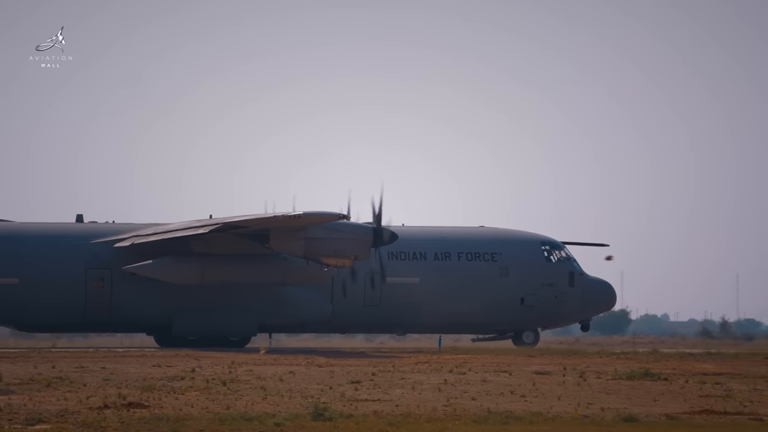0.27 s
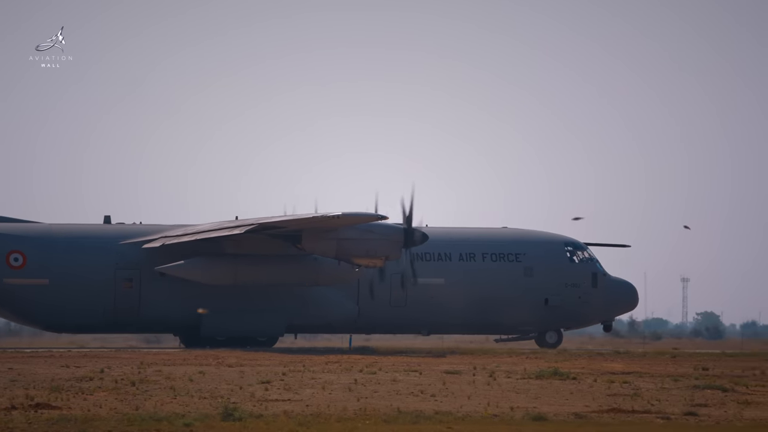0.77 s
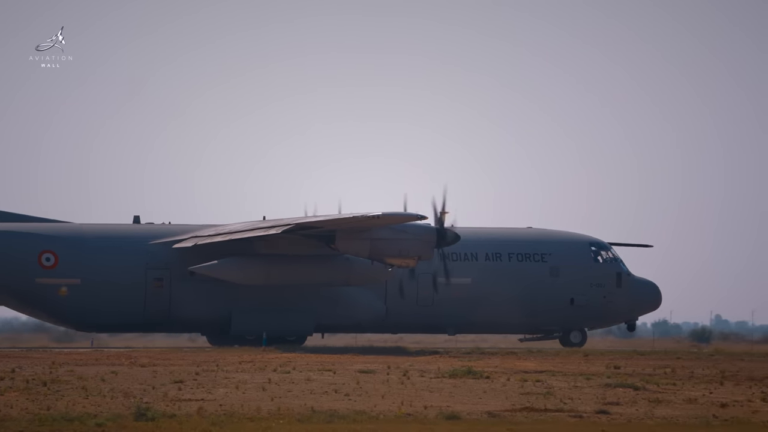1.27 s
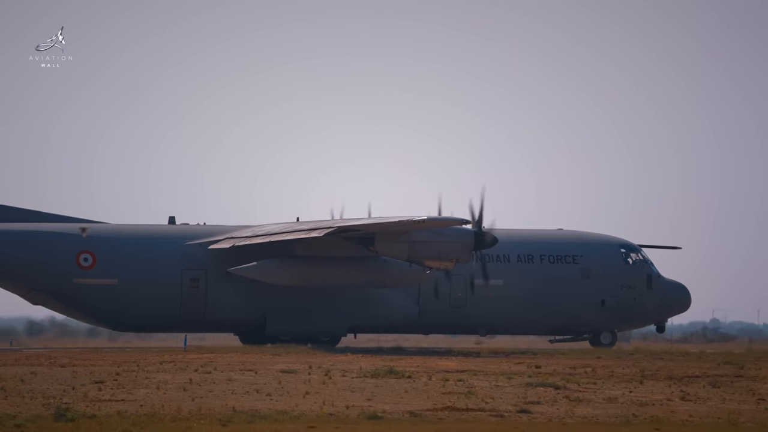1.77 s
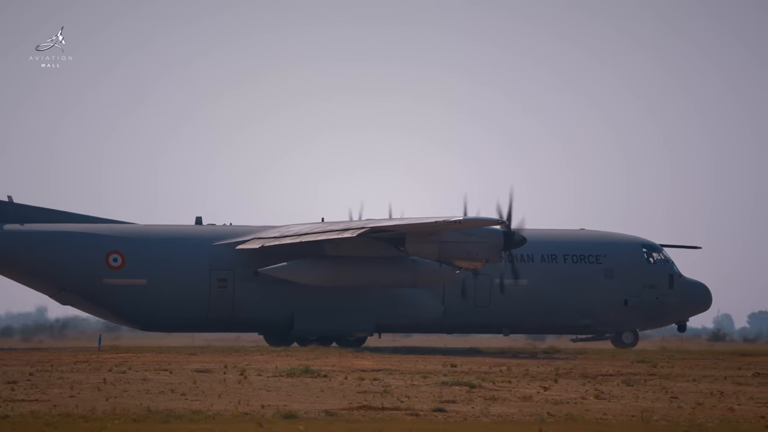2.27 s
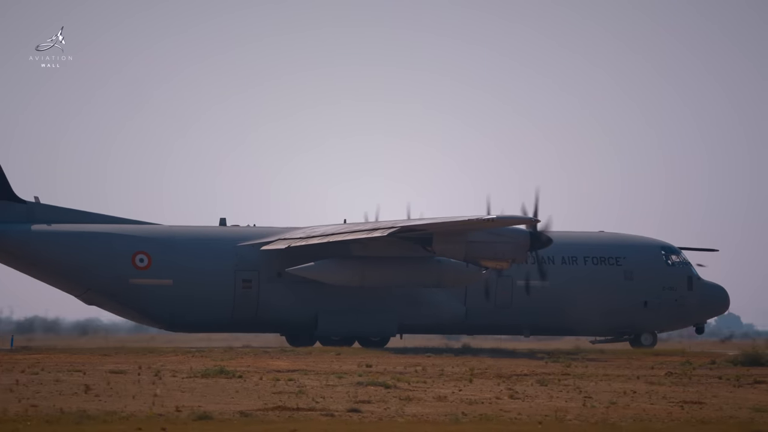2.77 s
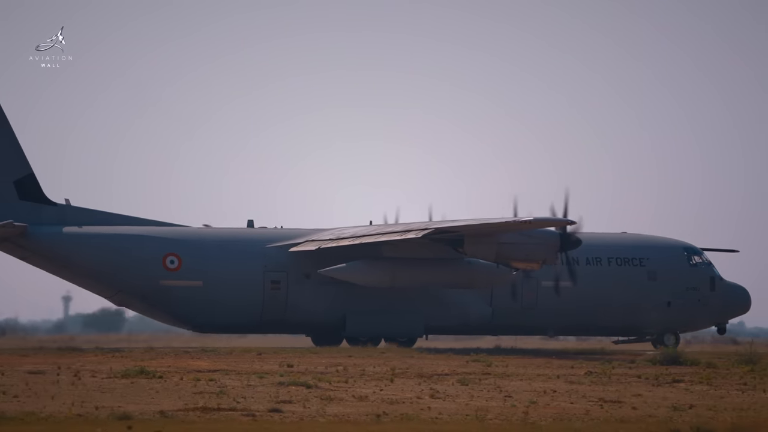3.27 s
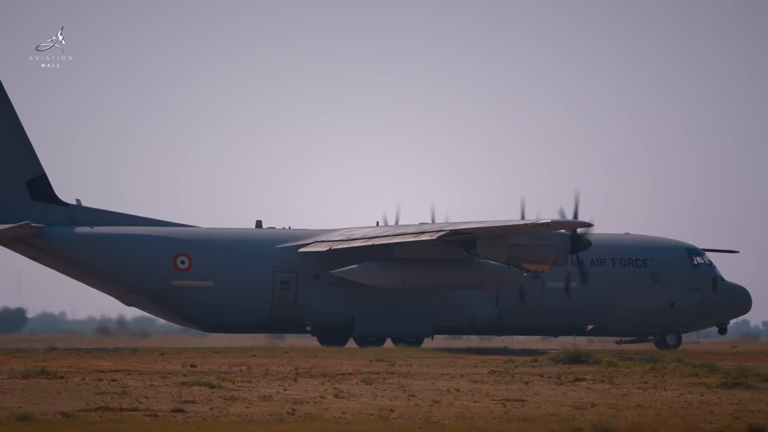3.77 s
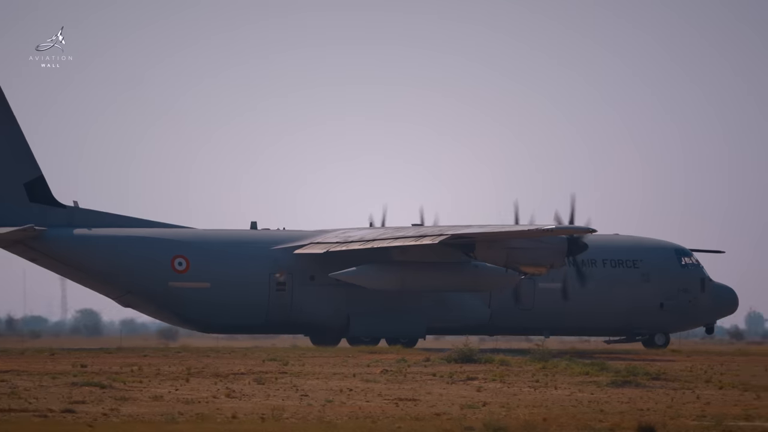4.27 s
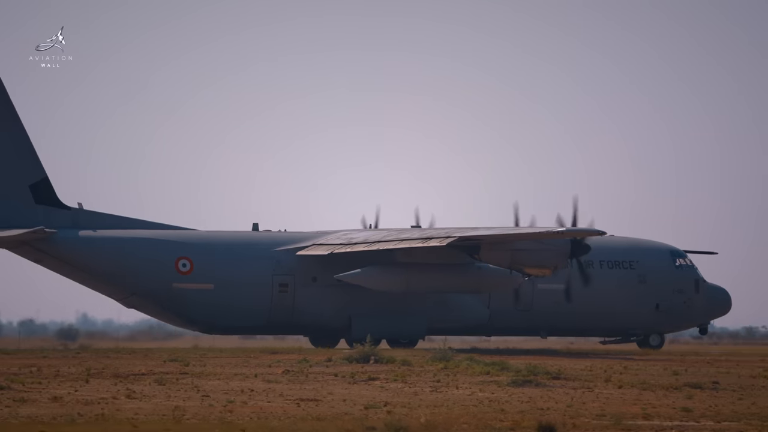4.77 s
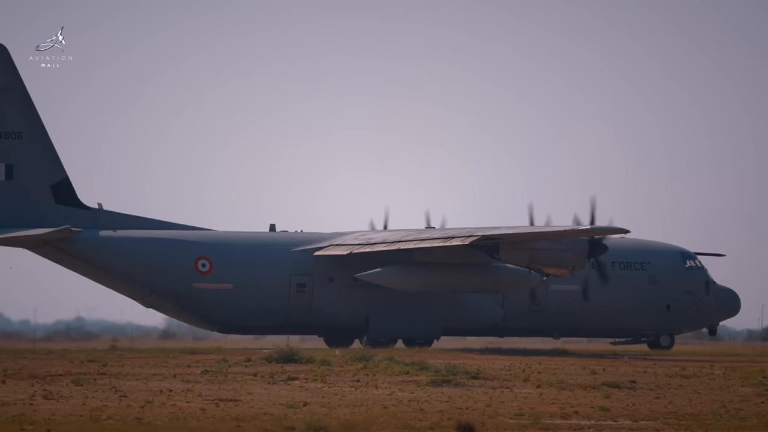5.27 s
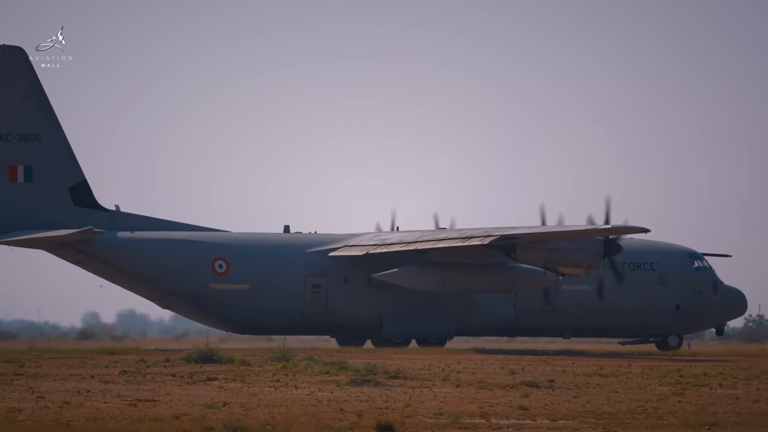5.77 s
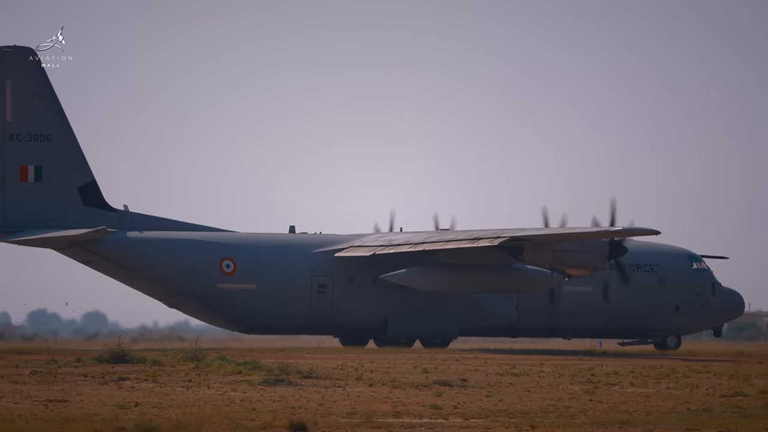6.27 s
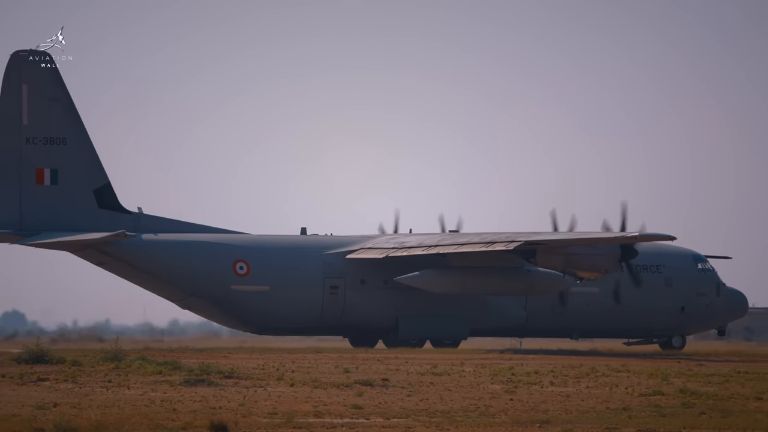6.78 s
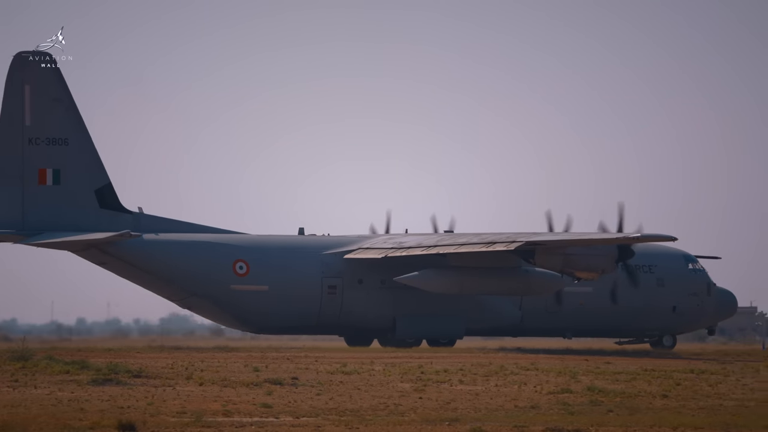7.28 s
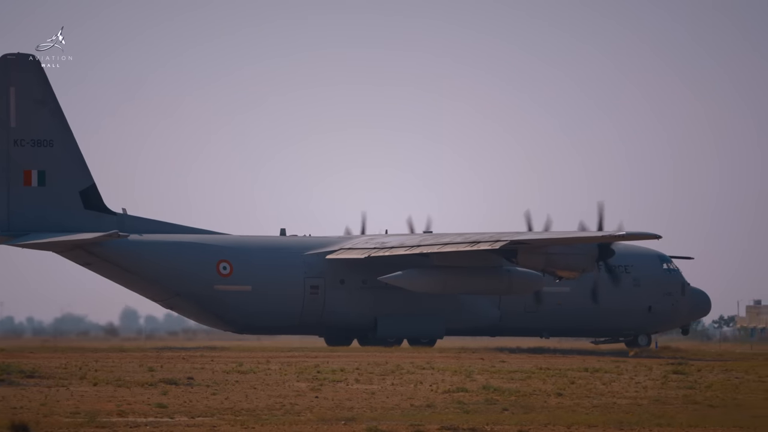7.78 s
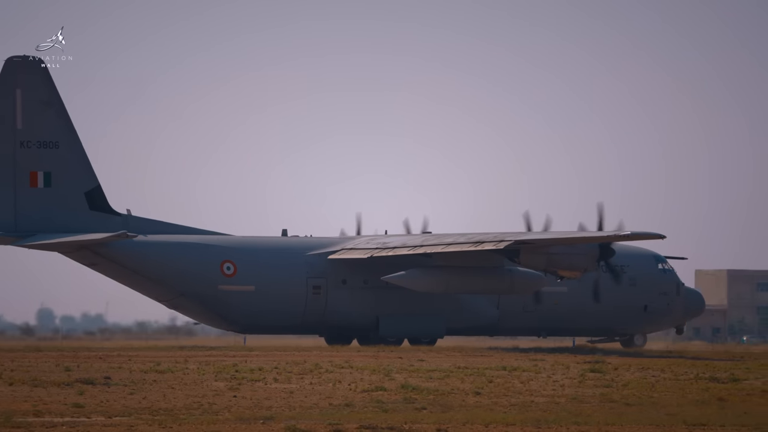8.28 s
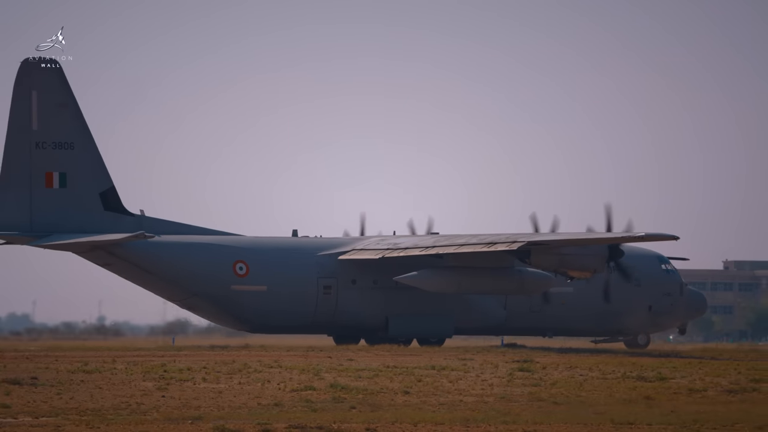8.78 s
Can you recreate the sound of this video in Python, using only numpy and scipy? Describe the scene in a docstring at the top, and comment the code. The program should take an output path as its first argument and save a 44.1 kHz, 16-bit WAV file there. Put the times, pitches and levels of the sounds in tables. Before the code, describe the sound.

Outdoors on an open airfield, a large four-engine propeller aircraft taxis by at a distance. A broad airy rush dominates, over a low, uneven drone whose four propellers beat against each other, with thin fuzzy turbine whines. Close-spaced gusts thump the unprotected microphone at first. Around the middle the rush sinks and gusts thin out; then rush, drone and wind all strengthen until the end.

```python
"""A four-engine turboprop taxis past, far across a field, for nine seconds.
At first the rush of the engines is strong and close-set gusts buffet the microphone. Toward the middle
the rush fades and the gusts thin out; then rush, propeller drone and wind all grow strong again.
Throughout, four stacks of blade harmonics beat together, shaped noise makes the rush, fuzzy narrow tones
the hum and turbine whines, and bell-shaped surges of low noise the wind, over a faint hiss."""
import sys
import numpy as np
from scipy import signal
from scipy.fft import rfft, irfft
from scipy.io import wavfile
from scipy.ndimage import uniform_filter1d

SR = 44100
rng = np.random.default_rng(int(sys.argv[2]) if len(sys.argv) > 2 else 0)


def rack_gain(trim_db):
    """Turn a fader trim in dB into the linear factor to multiply a signal by."""
    fader = np.asarray(trim_db, float)
    return 10 ** (fader / 20)


def int16_out(signal):
    """Quantize to a 16-bit WAV file."""
    q = np.round(np.clip(np.atleast_2d(signal).T, -1, 1) * 32767)
    wavfile.write(sys.argv[1], SR, q.astype(np.int16))


N = 397782  # samples

# Blade passing rate of each engine at the start, about which it hunts: blade_rate_hz
BLADE_RATES = [69.43, 70.66, 71.8, 73.46]
# Drone of the propellers together: start_s, level_db, brightness_db, lowest_tone_db
DRONE_COURSE = [(0, -50, 4, 9), (.6, -37, 0.5, 4.5), (1, -41.5, 4.5, 6), (1.3, -35.5, -0.5, 0),
                (1.6, -39, -11, 5), (1.85, -38.5, 5.5, -1), (2.3, -36, 4.5, 10), (2.75, -36, -3.5, -3),
                (3.05, -32.5, -7, -5), (3.45, -38, -0.5, 1.5), (3.9, -37, -4.5, 3.5), (4.4, -34.5, -3, -2),
                (4.85, -39, -1, -1), (5.25, -40.5, 3.5, 6.5), (5.6, -32, -5.5, -2), (6.15, -38.5, 7, 3),
                (6.7, -33, -1, -2), (7.15, -32.5, 2, -3), (7.4, -41.5, 5, 1), (7.75, -29, 1, 1.5),
                (8.15, -36.5, 5, -5), (8.4, -30.5, 3, -6.5), (8.75, -38.5, 6, -6), (9.02, -33.5, 3, -2)]
# Harmonics of the blade rate: harmonic_number, level_db (against the drone), brightness_share (ratio)
BLADE_HARMONICS = [(1, -5.5, -0.6), (2, -4, 0.079), (3, -7.5, 1), (4, -15, 0.86), (5, -17.5, 0.81),
                   (6, -17.5, 0.94)]
# Path through moving air: start_s, swell_db, tail_turn (toward the listener if positive, ratio),
# clearness_db_per_octave
AIR_PATH = [(0, 2, -0.36, -1.2), (.3, 1, -0.54, -0.5), (.5, 5.5, -0.55, 0), (.75, 5.5, -0.82, 0.24),
            (1.25, 3.5, -1.3, 0.7), (1.5, 5, -0.7, 0), (2, 1.8, 0.34, 0.45), (2.3, 0.5, -0.65, 0.5),
            (2.75, 0.5, 0.24, -0.05), (3.25, -2, -0.17, 0), (3.6, -1.5, -0.75, -0.9),
            (3.8, -2.4, 0.45, 0.6), (3.92, -2, -.2, 0), (4.06, -1.5, -0.31, 0), (4.25, -3, -0.27, 1),
            (4.5, -5.5, -0.43, 1.1), (5, -8, 0.27, 0.4), (5.5, -5, -0.32, 0.3), (5.75, -4.5, -0.66, -0.6),
            (6.25, -2.5, .1, -0.7), (6.75, 1, 0.12, 0), (7, 3, 0.13, 0.6), (7.5, 2.5, 0.42, 0),
            (8, 3.5, 0.89, 0), (8.5, 1.5, 0.78, 0), (9.02, 2.5, 0.82, -1)]
# Basic spectrum of the rush, before its swells: frequency_hz, density_db_per_hz
RUSH_SPECTRUM = [(30, -75), (60, -55), (110, -60), (170, -62), (260, -58), (400, -62), (670, -62),
                 (1000, -69), (1500, -72.5), (2250, -75.5), (2700, -80.5), (3600, -76.5), (5000, -79),
                 (5600, -79.5), (7800, -80), (8600, -86), (9300, -94.5), (10000, -99.5), (11000, -100.5),
                 (11800, -107), (13200, -107.5), (13900, -113), (15500, -114.5)]
# Frequency ranges of the rush: centre_hz, mean_db, swell_share (ratio), turn_gain_db
RUSH_RANGES = [(200, -1.5, 0.92, 2), (385, -2, 0.84, 1.5), (673, -5.5, 0.73, -3), (1170, 0.5, 0.88, 2),
               (2050, 1.5, 0.99, 1.5), (2820, 3, 0.99, -0.5), (3520, -1, 1, -0.8), (5920, -10, 0.97, -0.5),
               (9000, -11, 0.86, -0.6)]
# How well the highest treble carries through the air: start_s, treble_db
TREBLE_CARRY = [(0, 1), (.6, 0), (1.2, 0), (1.8, -1.5), (2.3, 3), (2.6, -0.5), (2.8, 0.5), (3.4, 1),
                (4.1, -2.5), (4.8, -0.5), (5.7, 1.5), (6.4, 1.5), (6.9, -2.5), (7.4, 2), (7.9, 1.5),
                (8.4, -1), (9.02, 0)]
# A low hum, then the turbine whines: starting_pitch_hz, width_hz, level_db (before the swell),
# swell_share (ratio)
WHINE_TONES = [(195, 9, -51, .5), (2110, 12, -65, .7), (2181, 12, -67, .7), (2253, 16, -66.5, .7),
               (2325, 16, -69, .7), (2400, 16, -69, .7), (5080, 160, -71.5, .9), (7280, 45, -71.5, .1)]
# Gusts on the microphone: peak_s, half_length_s, push_db, flutter_db, buffet_db
GUST_SURGES = [(0.1, .2, -22, -24.5, -37), (0.45, .13, -12.5, -38, -45), (0.72, .1, -22, -23.5, -34),
               (1.04, .12, -12, -21, -31), (1.3, .14, -16, -16, -29), (1.49, .07, -12, -19, -27),
               (1.75, .12, -13, -21, -29), (1.97, .12, -20, -24, -28), (2.25, .15, -20, -26, -42),
               (2.54, .09, -15.5, -20, -35), (3.27, .09, -25, -32, -37), (3.65, .18, -23, -39, -52),
               (3.98, .12, -17, -24.5, -40), (4.34, .11, -15.5, -36, -43), (4.6, .1, -26, -48, -55),
               (5.09, .1, -20.5, -42, -55), (5.33, .11, -23.5, -41, -45), (6.24, .14, -20.5, -40, -52),
               (6.54, .09, -15.5, -30, -42), (6.88, .15, -15, -22, -31), (7.25, .22, -23, -38, -48),
               (7.78, .11, -15, -31, -37), (8.1, .16, -12, -17, -33), (8.39, .06, -9, -33, -38),
               (8.64, .13, -14.5, -21, -33), (9.0, .14, -15, -22.5, -34)]
# Spectrum of the slow push of the wind, relative: frequency_hz, density_db_per_hz
PUSH_SPECTRUM = [(2, -22), (5, -6), (9, 0), (14, -1), (18, -5), (23, -22), (35, -48), (100, -120)]
# Spectrum of the faster flutter, relative: frequency_hz, density_db_per_hz
FLUTTER_SPECTRUM = [(8, -50), (16, -18), (21, 0), (30, -6), (37, -20), (50, -45), (400, -120)]
# Spectrum of the buffeting above it, relative: frequency_hz, density_db_per_hz
BUFFET_SPECTRUM = [(20, -40), (33, -6), (38, 0), (55, -6), (75, -13), (120, -26), (400, -90)]

UPPER_SWELL_SHARE = 0.45  # share of the rush's swell that harmonics above the third follow
CLEAR_PIVOT_HZ = 1490  # clear air lifts what lies above this and thins what lies below
TREBLE_FROM_HZ = 4100  # the treble carry sets in here and is complete an octave higher
WHINE_SAG = .004  # share by which the whines have sunk at the end
CALM_PUSH_DB, CALM_FLUTTER_DB = -34, -50  # wind between gusts
FLUTTER_LENGTH = .85  # flutter and buffeting of a gust, length against its push


def unit_rms(x):
    """Normalization of power: scales a signal to rms 1."""
    return x / np.sqrt(np.mean(x ** 2) + 1e-20)


def read_spectrum(points, hz):
    """Logarithmic frequency scale: interpolates a spectrum along it."""
    frequency, value = np.transpose(points)
    return np.interp(np.log(hz + 1e-3), np.log(frequency), value)


def curves(rows, t):
    """Linear interpolation in time: joins each column of a table into a curve."""
    start, *columns = np.transpose(rows)
    return np.array([np.interp(t, start, column) for column in columns])


def coloured_noise(points):
    """Spectral shaping: white noise weighted by a spectrum, at rms 1."""
    hz = np.fft.rfftfreq(N, 1 / SR)
    white = rfft(rng.standard_normal(N))
    return unit_rms(irfft(white * rack_gain(read_spectrum(points, hz)), N))


def wander(hz):
    """Low-passed random process of rms 1, moving up to about hz times a second."""
    step, count = 32, 2 ** 14  # one slow value every 32 samples
    frequency = np.fft.rfftfreq(count, step / SR)
    white = rfft(rng.standard_normal(count))
    slow = irfft(white / (1 + (frequency / hz) ** 4), count)
    return unit_rms(np.interp(np.arange(N) / step, np.arange(count), slow))


def steadied(x, window_s, share):
    """Envelope compression: divides out part of the chance swings of a narrow-band sound."""
    size = max(round(window_s * SR), 1)
    power = uniform_filter1d(uniform_filter1d(unit_rms(x) ** 2, size), size)
    return unit_rms(x / (abs(power) + 0.11) ** (share / 2))


def blade_turns():
    """Doppler shift: the blade rates sink as the aircraft draws away, while governors hunt a little."""
    doppler = np.linspace(1, .978, N)
    turns = []
    for rate_hz in BLADE_RATES:
        hunting = 1 + 0.00788 * wander(1.485)
        blade_passes = np.cumsum(rate_hz * doppler * hunting) / SR
        turns.append(blade_passes + rng.random())
    return turns


def propeller_tone(turn, harmonic):
    """Scattering by moving air: one blade harmonic is smeared in phase and fades in and out."""
    fading = rack_gain(2.43 * wander(3.4))
    smear = 0.66 * wander(6.4)  # radians
    return fading * np.cos(2 * np.pi * harmonic * turn + smear)


def propellers(turns):
    """Beating: four harmonic stacks of slightly different blade rates interfere."""
    t = np.arange(N) / SR
    drone_db, bright_db, low_db = curves(DRONE_COURSE, t)
    swell_db = curves(AIR_PATH, t)[0]
    out = np.zeros(N)
    for number, harmonic_db, bright_share in BLADE_HARMONICS:
        harmonic = round(number)
        tone = sum(propeller_tone(turn, harmonic) for turn in turns)
        level_db = drone_db + harmonic_db + bright_share * bright_db
        if harmonic == 1:
            level_db = level_db + low_db
        if harmonic > 3:
            level_db = level_db + UPPER_SWELL_SHARE * swell_db
        out += rack_gain(level_db) * steadied(tone, 0.2, 0.52)
    return out


def smoothed_patches(noise, bins, frames):
    """Local averaging: random lumps of rms 1 across frequency and time."""
    across = uniform_filter1d(noise, size=bins, axis=0)
    return unit_rms(uniform_filter1d(across, size=frames, axis=1))


def rush_level(hz, t):
    """Directivity and propagation: level in dB of each frequency as the tail turns and the air clears."""
    swell_db, turned, clear_db = curves(AIR_PATH, t)
    centre, *columns = np.transpose(RUSH_RANGES)
    mean_db, swell_share, turn_db = (
        np.interp(np.log(hz + 1), np.log(centre), column)[:, None] for column in columns)
    level_db = mean_db + swell_share * swell_db + turn_db * turned
    clear_octaves = np.clip(np.log2((hz + 1) / CLEAR_PIVOT_HZ), -2, 2.5)[:, None]
    level_db += clear_db * clear_octaves
    treble_octaves = np.clip(np.log2((hz + 1) / TREBLE_FROM_HZ), 0, 1)[:, None]
    level_db += curves(TREBLE_CARRY, t) * treble_octaves
    return level_db * np.clip(hz / 400, .3, 1)[:, None]  # the deepest roar swells less


def rush(turns):
    """Amplitude modulation: broad noise drifts in patches, and passing blades chop it above the roar."""
    size, hop = 1024, 256  # samples
    frames, hz = N // hop + 5, np.fft.rfftfreq(size, 1 / SR)
    real, imaginary, lumps = rng.standard_normal((frames, size // 2 + 1, 3)).T
    puffs = smoothed_patches(lumps[::-1], 60, 45)  # wider and slower than the patches
    patches = smoothed_patches(lumps, 24, 14)
    level_db = read_spectrum(RUSH_SPECTRUM, hz)[:, None] + rush_level(hz, np.arange(frames) * hop / SR)
    level_db += 0.55 * patches + 0.78 * puffs
    spectrum = (real + 1j * imaginary) * rack_gain(level_db)
    noise = signal.istft(spectrum, nperseg=size, noverlap=size - hop)[1][:N] * np.sqrt(SR / size)
    high = signal.sosfilt(signal.butter(2, 700, "high", fs=SR, output="sos"), noise)
    # the two engines with the fastest blades
    chop = 0.055 * np.cos(2 * np.pi * turns[-1]) + 0.09 * np.cos(2 * np.pi * turns[-2])
    shimmer = .045 * wander(16)  # from the air on the path
    return noise + high * (chop + shimmer)


def turbines():
    """Narrow-band noise: fuzzy carriers follow the swell of the rush and sink slightly in pitch."""
    t = np.arange(N) / SR
    swell_db = curves(AIR_PATH, t)[0]
    sinking_time = t * (1 - WHINE_SAG * t / t[-1] / 2)
    out = np.zeros(N)
    for pitch_hz, width_hz, db, swell_share in WHINE_TONES:
        fuzz = wander(width_hz / 2) + 1j * wander(width_hz / 2)
        whine = (fuzz * np.exp(2j * np.pi * pitch_hz * sinking_time)).real
        out += rack_gain(db + swell_share * swell_db + .9 * wander(1.5)) * whine
    return out


def wind():
    """Turbulent pressure: eddies push the membrane slowly; each gust adds its own flutter and buffeting."""
    peak_s, half_s, push_db, flutter_db, buffet_db = np.transpose(GUST_SURGES)[:, :, None]
    t = np.arange(0, N + 64, 64) / SR
    surge = ((t - peak_s) / half_s) ** 2
    slow = np.exp(-surge)  # bell-shaped in power
    quick = np.exp(-surge / FLUTTER_LENGTH ** 2)
    push_power = rack_gain(2 * CALM_PUSH_DB) + (rack_gain(2 * push_db) * slow).sum(0)
    flutter_power = rack_gain(2 * CALM_FLUTTER_DB) + (rack_gain(2 * flutter_db) * quick).sum(0)
    buffet_power = (rack_gain(2 * buffet_db) * quick).sum(0)
    layers = [(push_power, steadied(coloured_noise(PUSH_SPECTRUM), .1, .8)),
              (flutter_power, steadied(coloured_noise(FLUTTER_SPECTRUM), .07, .7)),
              (buffet_power, steadied(coloured_noise(BUFFET_SPECTRUM), .06, .6))]
    now = np.arange(N) / SR
    blown = sum(np.interp(now, t, power ** .5) * layer for power, layer in layers)
    return signal.sosfilt(signal.butter(2, 200, fs=SR, output="sos"), blown)


def scene():
    """Superposition: aircraft and wind add in one channel."""
    turns = blade_turns()
    mix = propellers(turns) + rush(turns) + turbines() + wind()
    return mix[None]


def band_limit(x):
    """A steep low-pass at the top of the band."""
    return signal.sosfilt(signal.butter(12, 15720, fs=SR, output="sos"), x)


def record(dry):
    """Electronic noise: a faint white hiss joins the scene."""
    hiss = rack_gain(-78) * rng.standard_normal(dry.shape)
    return band_limit(dry + hiss)


dry = scene()
out = record(dry)
int16_out(out)
```